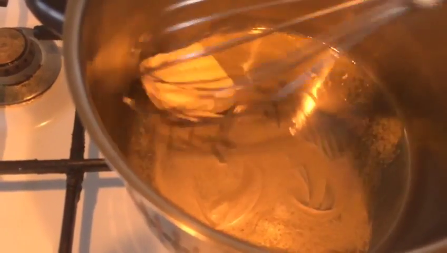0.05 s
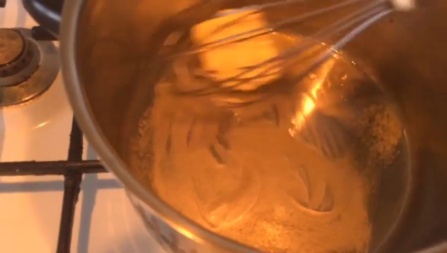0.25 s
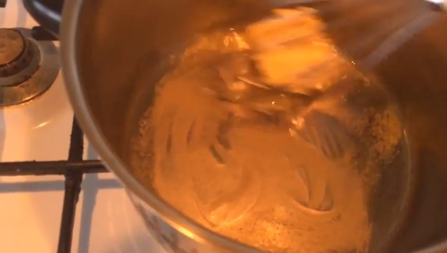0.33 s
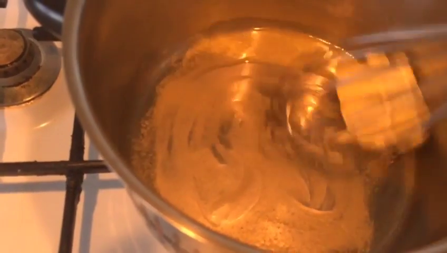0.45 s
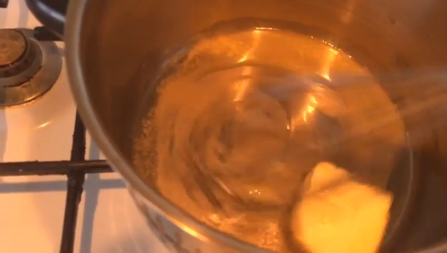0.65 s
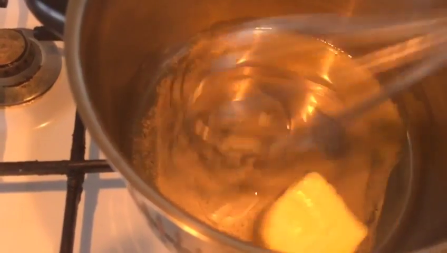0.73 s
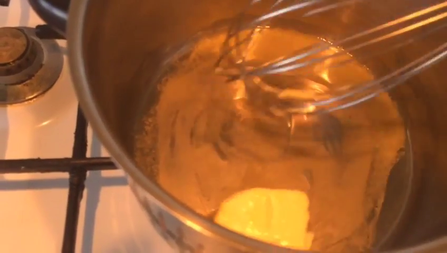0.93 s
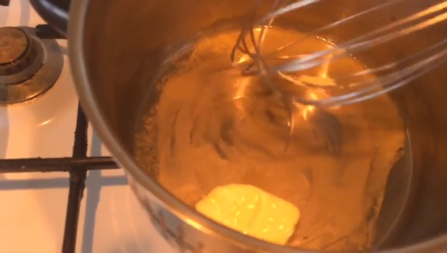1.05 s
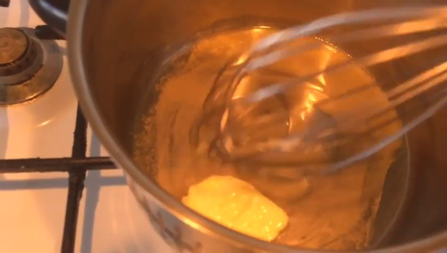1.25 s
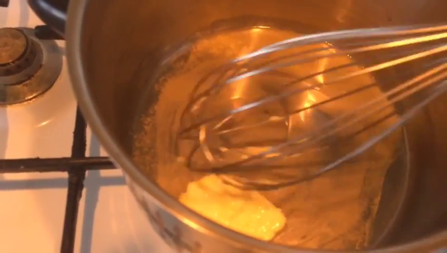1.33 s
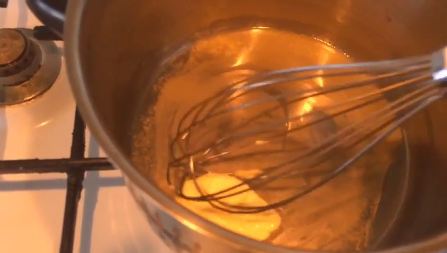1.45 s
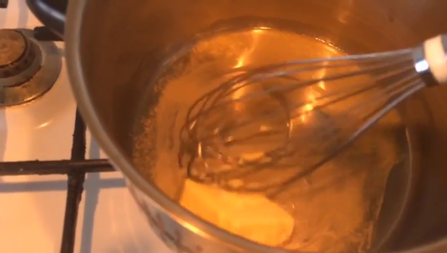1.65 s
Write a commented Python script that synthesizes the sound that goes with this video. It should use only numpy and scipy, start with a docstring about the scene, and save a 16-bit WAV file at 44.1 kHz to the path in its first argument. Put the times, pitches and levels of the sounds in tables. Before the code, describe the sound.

A wire whisk clanks and jangles on a steel saucepan, which knocks on the stove grate. The wires scrape the ringing wall, then tick and swish softly through melted butter. Close up, over faint kitchen hum and hiss.

```python
"""Whisking butter in a steel saucepan

A wire whisk clanks on the rim and jangles while the pan knocks on the grate of a gas stove.
The wires scrape along the wall, their tiny slips making the steel ring, then tick and swish
through melted butter. Underneath, the kitchen hums and hisses."""
import sys
import numpy as np
from scipy import signal
from scipy.fft import rfft, irfft, next_fast_len
from scipy.io import wavfile
from scipy.ndimage import map_coordinates

SR = 44100
rng = np.random.default_rng(int(sys.argv[2]) if len(sys.argv) > 2 else 0)


def unload_audio(sound):
    """Save the sound as a 16-bit wav file, at the path given as the first command line argument."""
    columns = np.transpose(np.atleast_2d(sound))
    # keep every value between -1 and 1, then stretch to whole-number steps
    steps = np.round(np.clip(columns, -1, 1) * 32767)
    wavfile.write(sys.argv[1], SR, steps.astype(np.int16))


N = 74970
TIME, HZ = np.arange(N) / SR, np.fft.rfftfreq(next_fast_len(N + SR), 1 / SR)

# Appliance hum partials: pitch_hz, rms_db
HUM_PARTIALS = [(49.3, -68.5), (98, -75.5), (492, -81.5)]
# Tone of the kitchen hiss: freq_hz, gain_db
HISS_EQ = [(20, -40), (40, 2), (75, -5), (130, -2), (170, -8), (355, -5.5), (700, -10.5), (1140, -15.5),
           (2200, -18.5), (2400, -10.5), (2700, -19.5), (5000, -20), (8900, -17), (11000, -26)]
# Fader curve of the low rumble: time_s, level_db
RUMBLE_FADER = [(0, -72), (.2, -67.5), (.45, -69), (.58, -65.5), (.65, -90), (1.7, -80.5)]
# Tone of the rumble: freq_hz, gain_db
RUMBLE_EQ = [(50, -20), (75, 4.5), (130, -7), (300, -5.5), (600, -11.5), (1000, -31.5)]

# Wires hitting the rim one after another: start_s, rim_gain_db, wire_gain_db
RIM_HITS = [(0.204, -17.5, -16.5), (.2105, -15, -18.5), (0.2171, -40, -14.5), (0.2222, -18, -25),
            (.232, -22, -25), (0.2441, -40, -24.5), (0.256, -20.5, -23.5), (.265, -35, -30),
            (0.2912, -26, -42), (.311, -45, -36.5)]
# Rim modes: pitch_hz
RIM_PITCHES = [1750, 2070, 3149, 3242, 3880, 4172, 4432, 4475, 4515, 5330, 5416, 5455, 5640, 6390, 6772,
               7751, 7842, 7885, 7950, 8000]
# Ring of each rim mode: width_hz, gain_db
RIM_MODES = [(29.8, -29.5), (24.8, -19.5), (18, -14), (18, -15), (15.9, -6.5), (25, -15), (12.3, -4.5),
             (13.9, -0.5), (18.3, -1.5), (28.7, -6), (25, -3.5), (25.4, -4), (24.3, -11.5), (18.9, -3.5),
             (22, -20), (25, -8), (25.5, -6), (20.2, -3), (22, -4.5), (25.1, -8)]
# Wire modes: pitch_hz
WIRE_PITCHES = [5851, 6060, 6200, 7015, 7142, 7224, 8483, 8721, 8864, 8918, 9098, 9380, 9572, 9625, 9679,
                9864, 9942, 10085, 10180, 10520]
# Ring of each wire mode: width_hz, gain_db
WIRE_MODES = [(18, -14), (28, -8), (32.4, -11.5), (20.6, -17), (24.2, -4.5), (19.9, -1.5), (22, 0),
              (24.2, -6.5), (23.4, -2), (25.6, -1), (24.4, -25), (27, -1.5), (22.222, -12), (25.6, -17),
              (23.8, -4), (21, 2.5), (22.3, -7), (23.6, 0), (28, -11.5), (28, -19)]
# The dense small modes as one wash: freq_hz, gain_db
JANGLE_EQ = [(470, -94), (800, -20), (2530, -19.5), (3150, -3), (3630, -13), (4430, 0), (4890, -27),
             (5390, -1.5), (9970, -4), (11000, -9), (14300, -36), (22000, -120)]

# Pan hitting the grate: start_s, gain_db, tilt_db_per_octave
GRATE_HITS = [(0.207, -56.5, -5.5), (0.292, -41.5, 0.5), (0.313, -44, 0)]
# Modes of the pan base and grate: pitch_hz
GRATE_PITCHES = [79, 123, 280, 371, 441, 580, 676, 886, 1371, 1995, 2707]
# Ring of each of those modes: width_hz, gain_db
GRATE_MODES = [(11.8, 4), (13.6, 1), (19, 5.5), (24.7, 2.5), (24, 4.5), (29, 1), (59.5, -1), (40, -1),
               (40.2, 2.5), (40, -3.5), (50, -5.5)]
# Broad thud of a knock: freq_hz, gain_db
THUD_EQ = [(35, -49), (60, -19), (125, 2.5), (240, -57), (280, 1), (540, -28), (583, -10.5), (6000, -22),
           (7800, -45), (13200, -120)]
# Click on the front of a knock: freq_hz, gain_db
CLICK_EQ = [(300, -47), (1200, 0), (2700, 8), (4000, -5), (5400, 2), (6500, -2), (9000, -20)]

# How hard the wires scrape: time_s, drive_db
SCRAPE_FADER = [(0.489, -78), (0.4913, -45), (.511, -43.5), (.537, -47.5), (.545, -47.5), (0.561, -44),
                (.593, -56), (.6, -54.5), (0.629, -61), (.641, -58.5), (.67, -52.5), (.69, -50.5),
                (.706, -50), (.722, -65), (.8, -79)]
# When the contact passes four places along the wall: time_s
CONTACT_TIMES = [.5, .555, .63, .69]
# Pan wall modes: pitch_hz
WALL_PITCHES = [1445, 1720, 2540, 2760, 2980, 3870, 4150, 5310, 5650, 5980, 6710, 7180, 7480, 8170, 8505,
                9080, 9600, 9960, 10300, 10550, 10950]
# Ring of each wall mode: width_hz, slide_hz_per_s, then gain_db at each of the four places
WALL_MODES = [(9.1, 22, -3.5, -14, -19, -9.5), (29.5, -6, -14, -23, -27, -15),
              (40, 0, -12.5, -28, -27, -40), (60, -300, -35, -20, -14.5, -50),
              (60, -900, -6.5, -25.5, -16.5, -25), (61.3, -8, -17.5, -22.5, -23, -12.5),
              (60.3, 3, -25, -24, -11, -46), (53, 196, -7, -16, -9, -1), (58, -1200, -22, -15, -3, -31),
              (34.5, 1, -24, -20, -27, -44), (39, 0, -12, -13, -13, -33), (54.3, 0, -13, -7.5, -1, -5),
              (60.4, -800, -7, -23, -7, -22), (50, 11, -17, -7, 1, -9), (24, 2, 2.5, 4, 10, -3.5),
              (87, 0, -5, -9, -9, -12.5), (90, 4, -31, -7, -36, -26), (70, 7, -31, -31, -14, -22),
              (80, 3, -22, -37, -3, -23), (82, 6, -31, -37, -14, -23), (60, 0, -29, -17, -18, -32)]
# Dry rasp of the slips: freq_hz, gain_db
RASP_EQ = [(120, -14), (200, 2), (1990, -38), (2690, -1), (3340, -28), (5440, -12), (6330, -11),
           (8410, -1.5), (11000, -20), (14300, -42), (22000, -120)]

# Wires tapping the buttered base: start_s, gain_db, low_layer_db
BASE_TICKS = [(0.904, -65, -12), (0.917, -59.5, -7), (1.049, -53, -25), (1.1405, -48, -12),
              (1.1564, -50, -19), (1.171, -49, -15), (1.2213, -47, -30), (1.246, -42, -38),
              (1.26, -48, -35), (1.3166, -48, -26), (1.3284, -40.5, -8), (1.3354, -60, -21),
              (1.354, -53, -30), (1.3663, -48.5, -26), (1.3873, -48, -20), (1.4095, -47, -16),
              (1.424, -42.5, -10.5), (1.43, -53, -23), (1.4454, -52, -26), (1.5637, -53, -31),
              (1.601, -46.5, -14), (1.6302, -46.5, -9)]
# Wet sizzle of ticks and swish: freq_hz, gain_db
BUTTER_EQ = [(900, -40), (1500, -11), (2300, -10.5), (3000, -16), (4300, -4), (6000, -1), (7200, -1),
             (8800, 2), (10000, 5), (11000, -18)]
# Lower layer of a tick: freq_hz, gain_db
TICK_LOW_EQ = [(800, -44), (1600, -7), (4200, 8), (6000, -28)]
# Strokes through the butter: time_s, gain_db
SWISH_FADER = [(.75, -67.5), (.8, -61), (.86, -76), (.92, -66), (1.0, -68.5), (1.06, -61), (1.13, -58.5),
               (1.18, -57.5), (1.21, -62.5), (1.27, -57), (1.31, -63), (1.37, -53.5), (1.43, -63.5),
               (1.47, -62.5), (1.54, -71), (1.58, -60), (1.64, -66.5), (1.7, -72)]

# Kitchen reverb decay: freq_hz, t60_s
ROOM_DECAY = [(200, 1), (2000, 0.47), (10000, 0.33)]


def amp(db):
    return 10 ** (np.asarray(db) / 20)


def unit_rms(x):
    return x / np.sqrt(np.mean(x ** 2) + 1e-20)


def curve_at(points, hz):
    """Read a breakpoint curve on a log frequency axis."""
    freqs, values = np.transpose(points)
    return np.interp(np.log(hz + 1), np.log(freqs + 1), values)


def filtered(x, response):
    """Filter x with a response given on HZ."""
    size = next_fast_len(N + SR)
    return irfft(rfft(x, size) * response, size)[:N]


def noise(eq):
    """Noise coloured by an EQ curve, rms 1."""
    return unit_rms(filtered(rng.standard_normal(N), amp(curve_at(eq, HZ))))


def resonances(pitches, modes):
    """Frequency response of a bank of ringing modes, alternating in polarity."""
    return sum((-1) ** k * amp(db) * 1j * HZ * width / (hz * hz - HZ * HZ + 1j * HZ * width)
               for k, (hz, (width, db)) in enumerate(zip(pitches, modes)))


def hit_envelope(start_s, rise_s, t60_s):
    """Quick attack, exponential decay."""
    age = np.maximum(TIME - start_s, 0)
    return (1 - np.exp(-age / rise_s)) * amp(-60 * age / t60_s)


def grains(per_s, spread_db):
    """Irregular impulses of uneven size, rms 1."""
    chance, size = rng.random((2, N))
    gain = amp(spread_db * np.minimum(-np.log(size + 1e-9), 3))
    return unit_rms((chance < per_s / SR) * gain * rng.standard_normal(N))


def wobble(per_s):
    """Smooth random modulation through per_s points a second."""
    return map_coordinates(rng.standard_normal(512), [TIME * per_s])


def kitchen_bed():
    """An appliance hums unsteadily over steady hiss and a passing rumble."""
    hum = 0
    for hz, db in HUM_PARTIALS:
        waver_db, drift = 1.5 * wobble(per_s=8), 0.19 * wobble(per_s=8)
        phase = 2 * np.pi * hz * TIME + drift + rng.uniform(0, 2 * np.pi)
        hum = hum + np.sqrt(2) * amp(db + waver_db) * np.sin(phase)
    rumble = amp(np.interp(TIME, *np.transpose(RUMBLE_FADER))) * noise(RUMBLE_EQ)
    return hum + amp(-68) * noise(HISS_EQ) + rumble


def rim_clank(ring_db=34, jangle_db=-31):
    """Every hit rings both the rim and the wires, over a jangle of small modes."""
    starts, rim_db, wire_db = np.transpose(RIM_HITS)
    delays = np.exp(-2j * np.pi * HZ[:, None] * starts)
    rim = delays @ amp(rim_db) * resonances(RIM_PITCHES, RIM_MODES)
    wires = delays @ amp(wire_db) * resonances(WIRE_PITCHES, WIRE_MODES)
    jangle = sum(force * hit_envelope(start, rise_s=0.00075, t60_s=0.18)
                 for start, force in zip(starts, amp(rim_db) + amp(wire_db)))
    return amp(ring_db) * irfft(rim + wires)[:N] + amp(jangle_db) * jangle * noise(JANGLE_EQ)


def grate_knock(ring_db=40.5, thud_db=-2.5, click_db=-2.5):
    """The pan rocks against its grate: a click, a hollow ring and a dull rattle."""
    modes = resonances(GRATE_PITCHES, GRATE_MODES)
    out = 0
    for start, db, tilt_db in GRATE_HITS:
        tilt = amp(tilt_db * np.log2(HZ / 100 + 1))
        body = unit_rms(filtered(rng.standard_normal(N), modes)) + amp(thud_db) * noise(THUD_EQ)
        rattle = unit_rms(filtered(body, tilt)) * hit_envelope(start, rise_s=0.001, t60_s=0.38)
        click = amp(click_db + 4.4 * tilt_db) * noise(CLICK_EQ)  # duller knocks click less
        click *= hit_envelope(start, rise_s=0.00022, t60_s=0.04)
        delay = np.exp(-2j * np.pi * HZ * start)
        ring = amp(ring_db) * irfft(modes * tilt * delay)[:N]
        out = out + amp(db) * (ring + rattle + click)
    return out


def wall_scrape(ring_db=19, rasp_db=-17, landing_db=-26, grip_per_s=34.66):
    """Dense wire slips drive the wall's modes, which slide and trade strength as the contact moves."""
    times, drive_db = np.transpose(SCRAPE_FADER)
    chatter_db = 2 * wobble(per_s=180)
    slips = grains(per_s=12000, spread_db=1.5)
    slips *= amp(np.interp(TIME, times, drive_db, -120, -120) + chatter_db)
    rasp = filtered(slips, unit_rms(amp(curve_at(RASP_EQ, HZ))))
    landing = amp(landing_db) * (np.arange(N) == round(times[1] * SR))  # tick as the wires land
    ring = 0
    for hz, (width, slide, *place_db) in zip(WALL_PITCHES, WALL_MODES):
        glide_hz = slide * np.clip(TIME - CONTACT_TIMES[0], 0, .3)
        pitch = hz + glide_hz + .003 * hz * wobble(grip_per_s)
        grip_db = 2 * wobble(grip_per_s)  # the wires grip each mode unevenly
        push = amp(np.interp(TIME, CONTACT_TIMES, place_db) + grip_db) * (slips + landing)
        # A one-pole resonator that follows the moving pitch.
        carrier = np.exp(2j * np.pi * np.cumsum(pitch) / SR)
        loss = np.pi * width / SR
        ring = ring + 2 * (signal.lfilter([loss], [1, loss - 1], push / carrier) * carrier).real
    return amp(ring_db) * ring + amp(rasp_db) * rasp


def butter_swish(trim_db=-5):
    """Wires drag through melted butter in wet, grainy swells."""
    times, gain_db = np.transpose(SWISH_FADER)
    wet = unit_rms(filtered(grains(per_s=6000, spread_db=2.5), amp(curve_at(BUTTER_EQ, HZ))))
    return amp(np.interp(TIME, times, gain_db, -120) + trim_db) * wet


def base_ticks(trim_db=-4, tail_db=-14):
    """Wires tick on the buttered base: a bright snap with a soft tail and a lower layer."""
    bright = low = 0
    for start, db, low_db in BASE_TICKS:
        snap = hit_envelope(start, rise_s=0.0006, t60_s=0.02)
        tail = amp(tail_db) * hit_envelope(start, rise_s=0.0035, t60_s=0.06)
        envelope = amp(db + trim_db) * (snap + tail)
        bright = bright + envelope
        low = low + amp(low_db) * envelope
    return bright * noise(BUTTER_EQ) + low * noise(TICK_LOW_EQ)


def room_reverb(x, predelay_samples=300):
    """The kitchen answers with a diffuse tail whose highs die first."""
    hz, age, spectrum = signal.stft(rng.standard_normal(SR // 2), SR, nperseg=256)
    decay = amp(-60 * age / curve_at(ROOM_DECAY, hz)[:, None])
    tail = signal.istft(spectrum * decay, SR, nperseg=256)[1]
    return signal.fftconvolve(np.pad(x, (predelay_samples, 0)), tail / np.linalg.norm(tail))[:N]


def scene():
    """Whisk and pan up close with a touch of room, over the kitchen bed, in mono."""
    bed = kitchen_bed()
    close = rim_clank() + grate_knock() + wall_scrape() + butter_swish() + base_ticks()
    return (bed + close + amp(-13) * room_reverb(close))[None]


def record(dry):
    """A steep high cut on the whole mix."""
    cutoff_hz, edge_hz = 11000, 300
    high_cut = np.clip((cutoff_hz + edge_hz - HZ) / (2 * edge_hz), 0, 1) ** 2
    return filtered(dry[0], high_cut)[None]


dry = scene()
out = record(dry)
unload_audio(out)
```